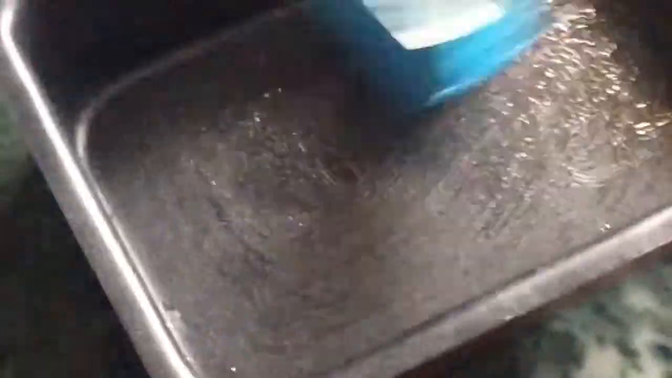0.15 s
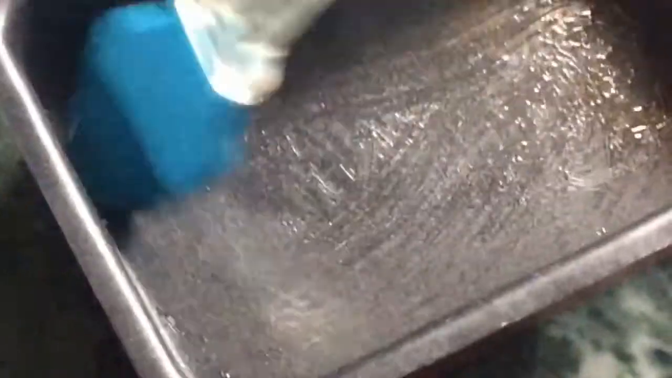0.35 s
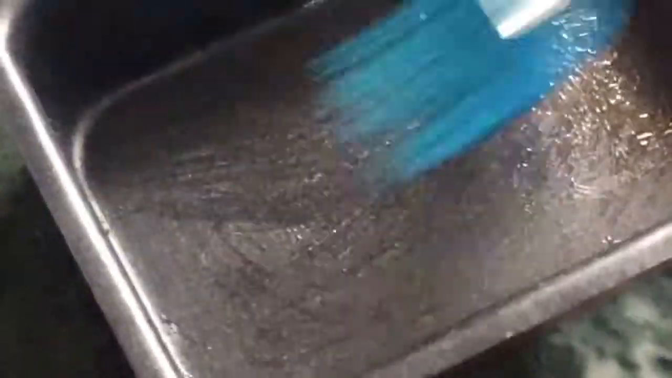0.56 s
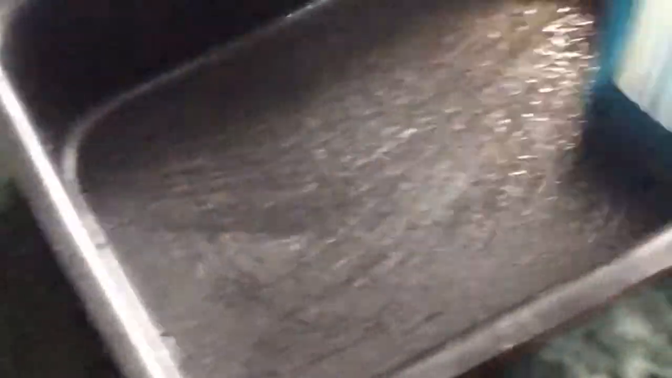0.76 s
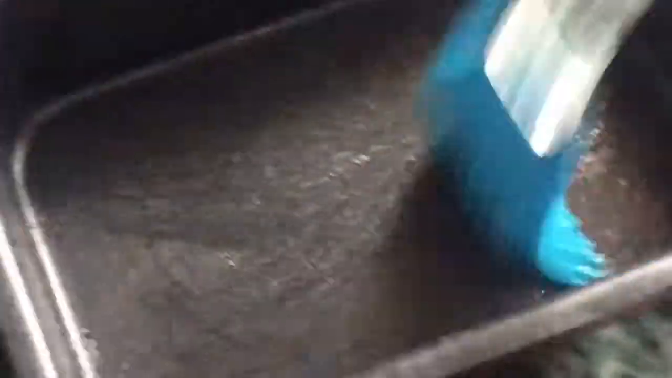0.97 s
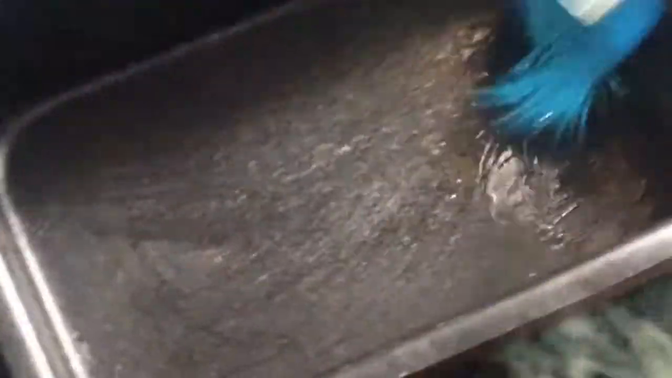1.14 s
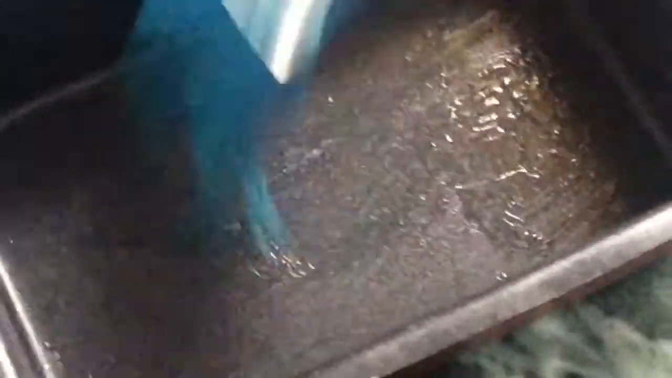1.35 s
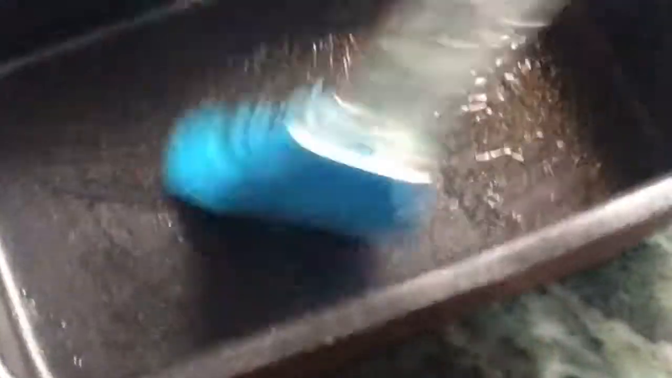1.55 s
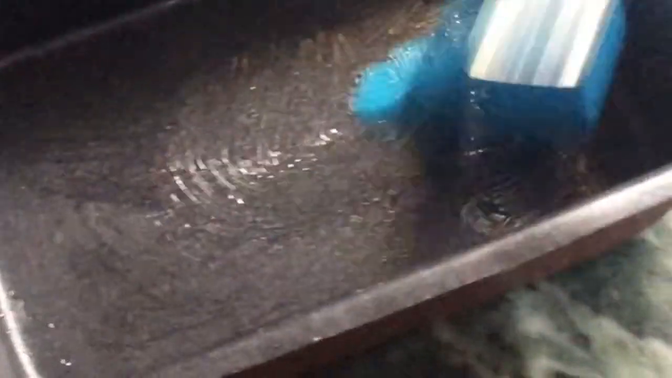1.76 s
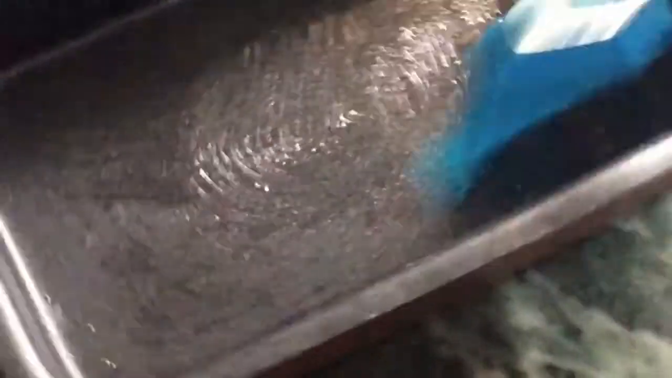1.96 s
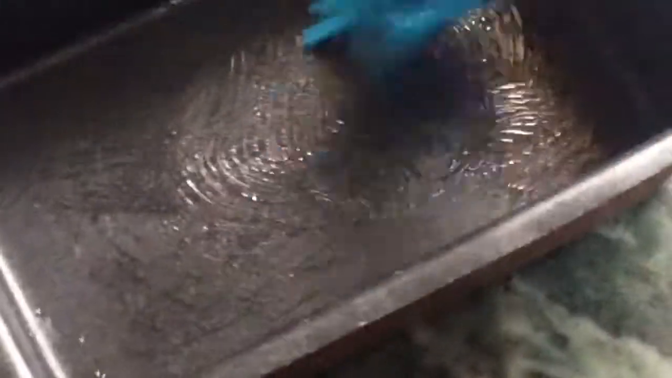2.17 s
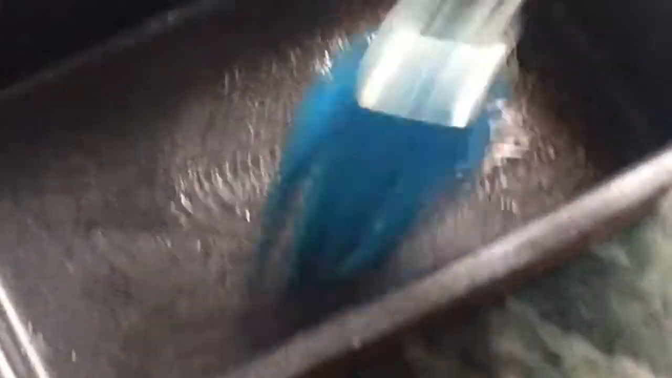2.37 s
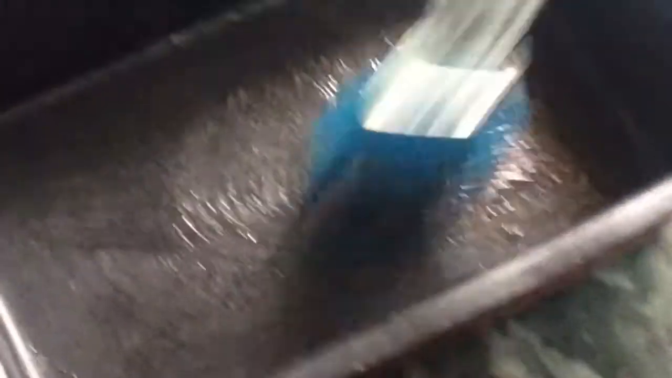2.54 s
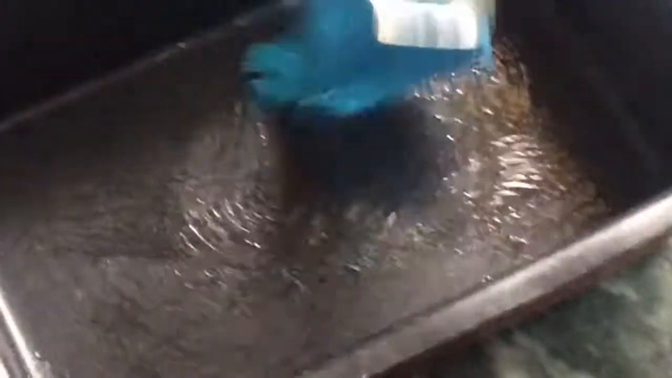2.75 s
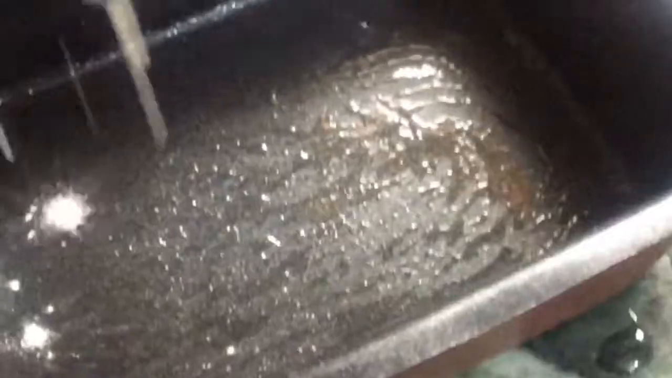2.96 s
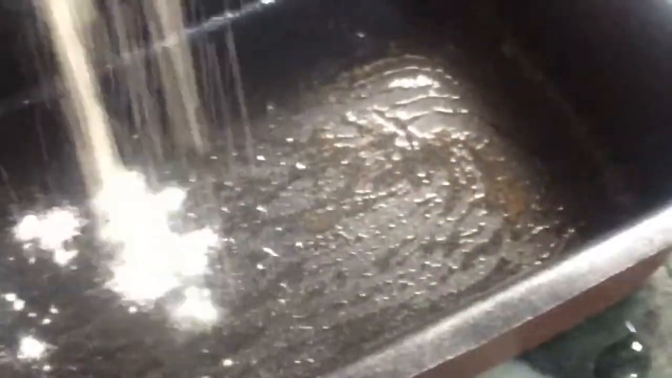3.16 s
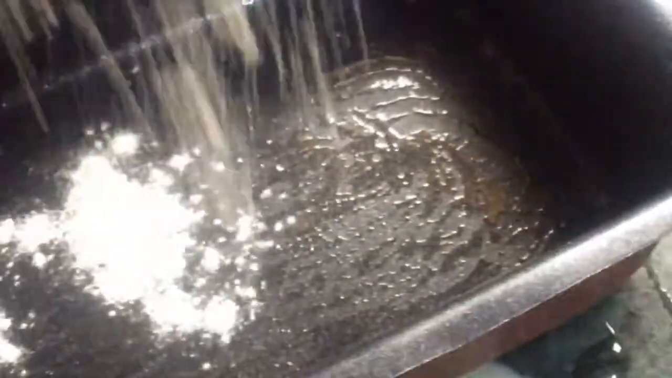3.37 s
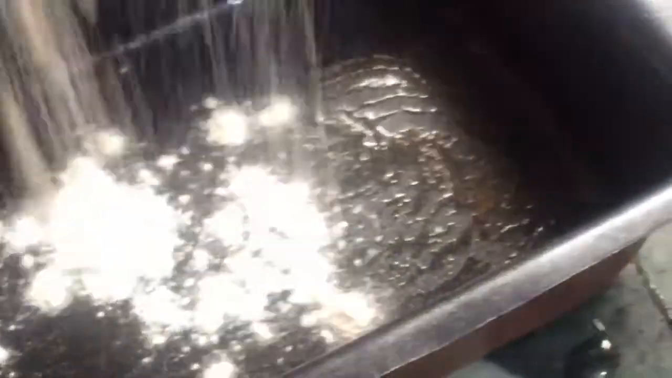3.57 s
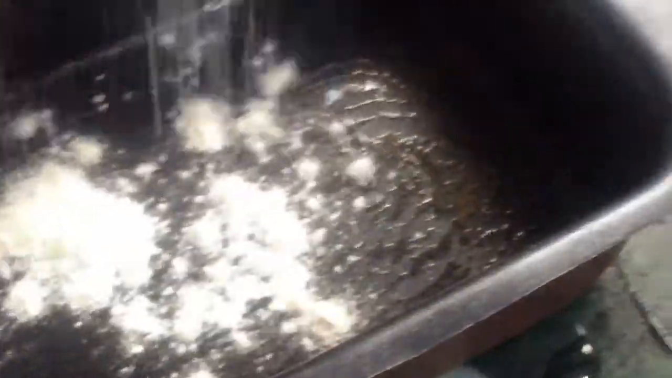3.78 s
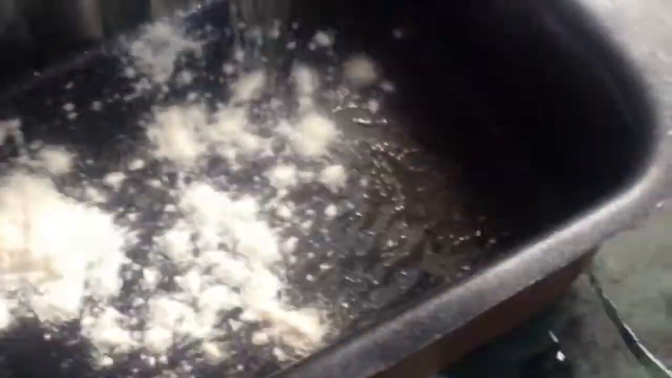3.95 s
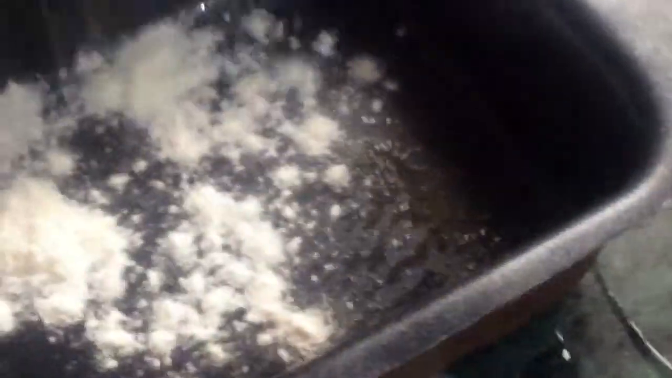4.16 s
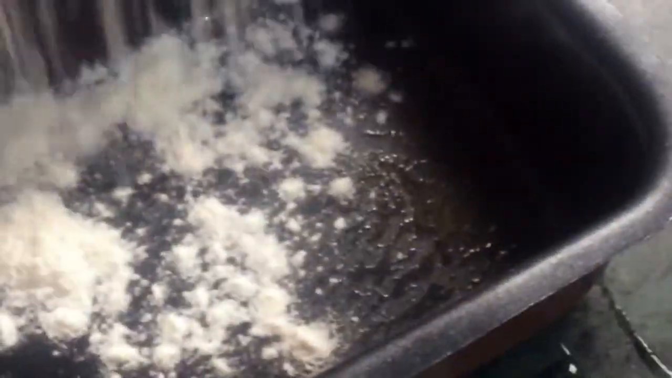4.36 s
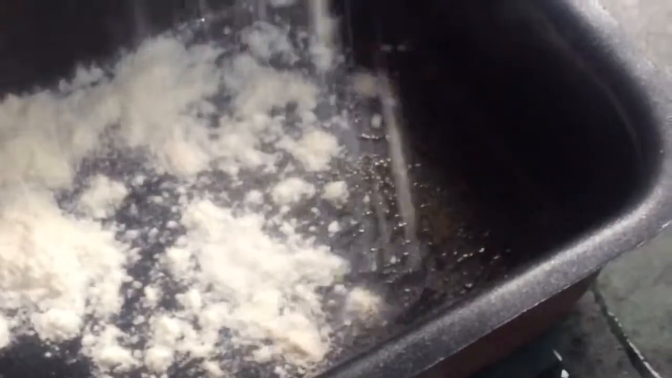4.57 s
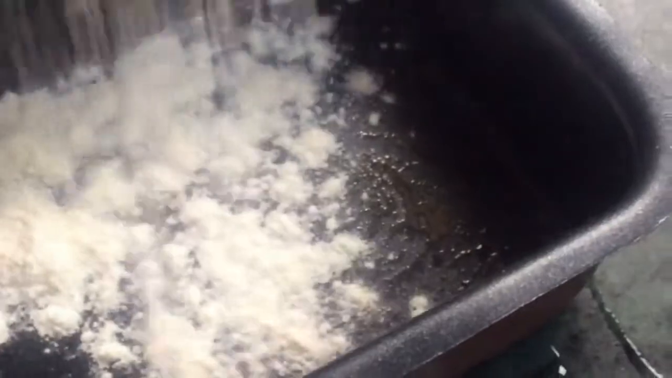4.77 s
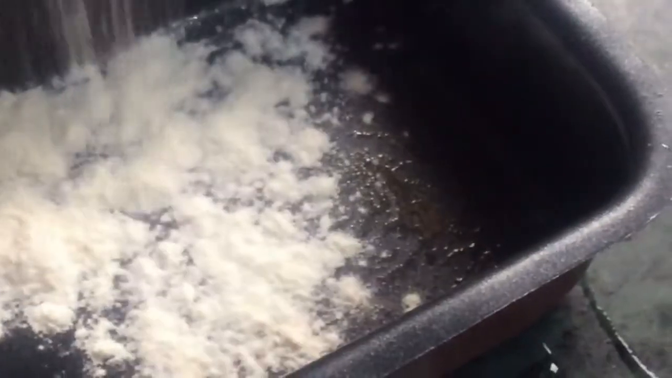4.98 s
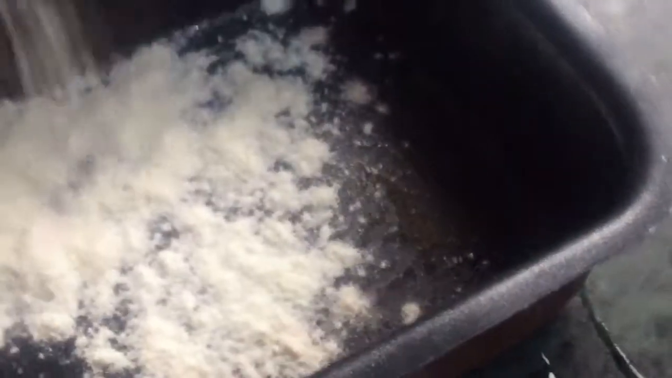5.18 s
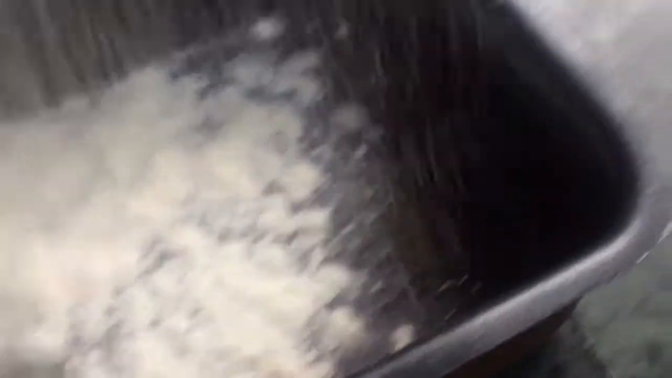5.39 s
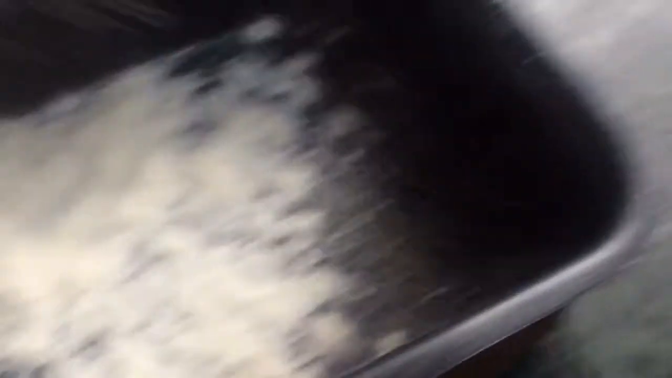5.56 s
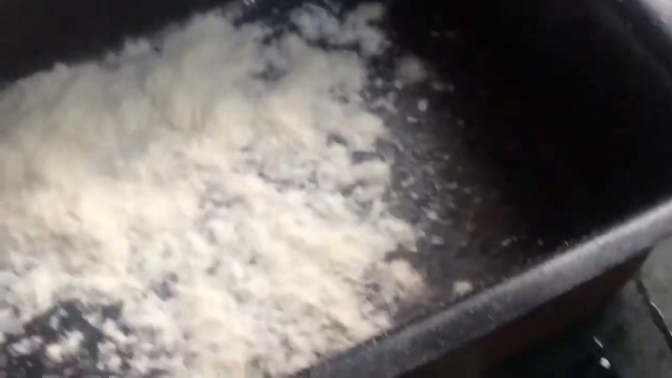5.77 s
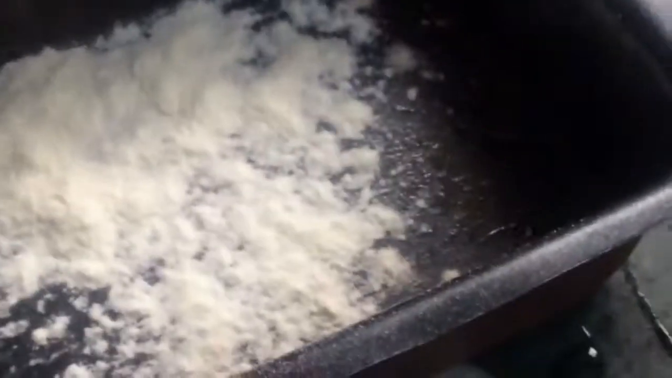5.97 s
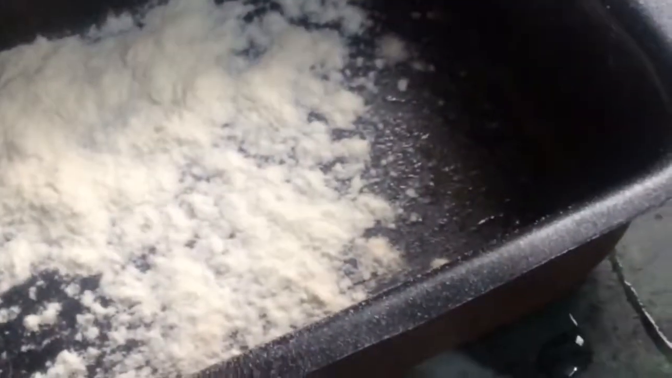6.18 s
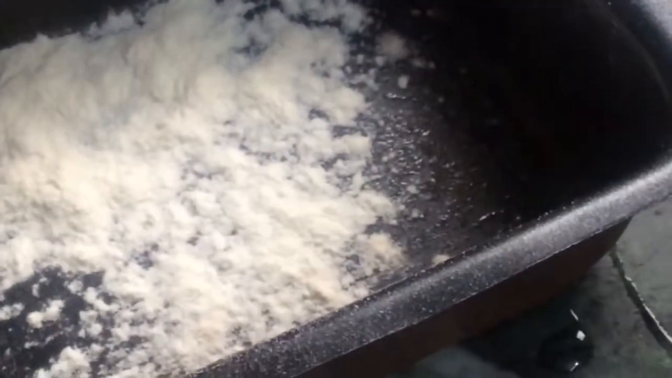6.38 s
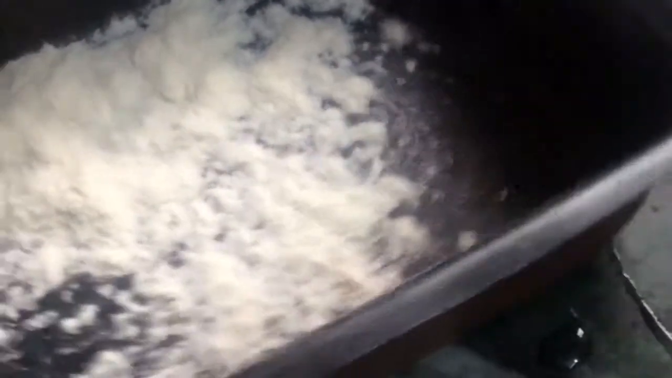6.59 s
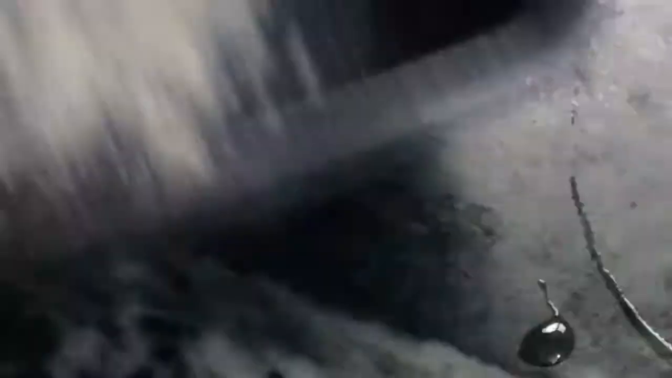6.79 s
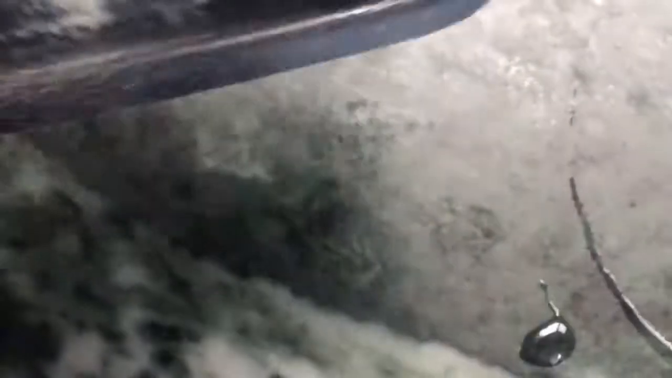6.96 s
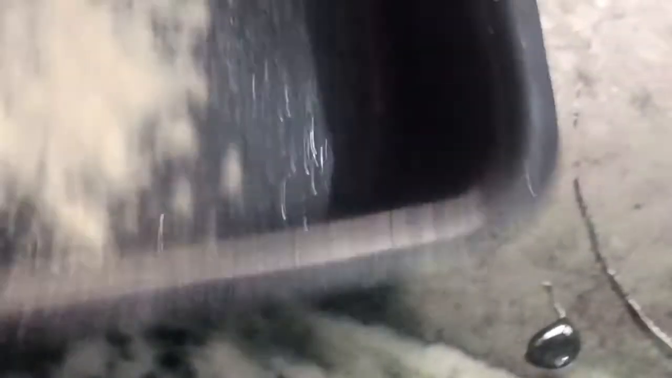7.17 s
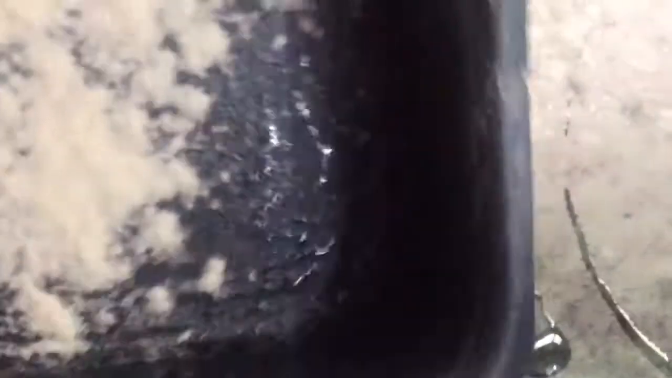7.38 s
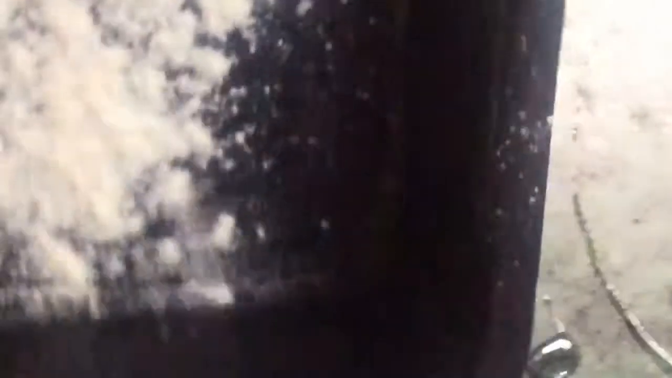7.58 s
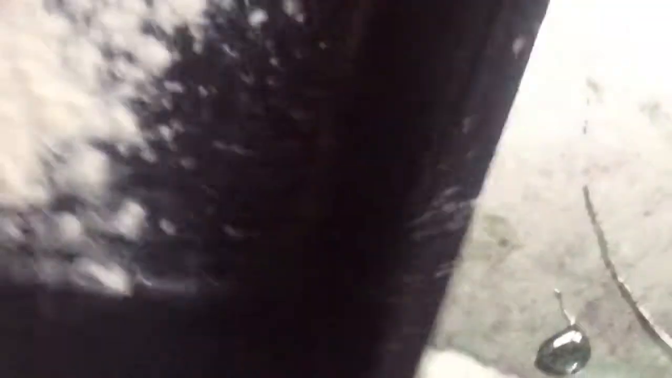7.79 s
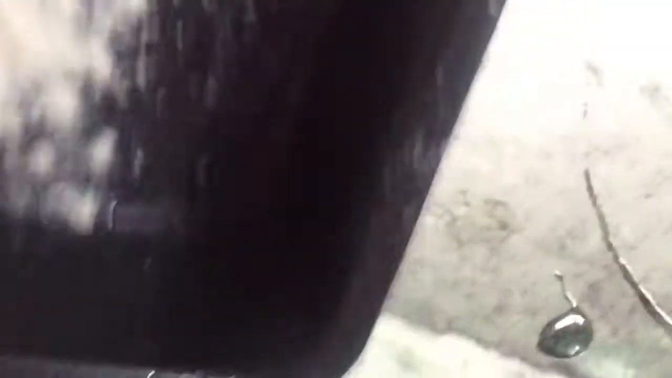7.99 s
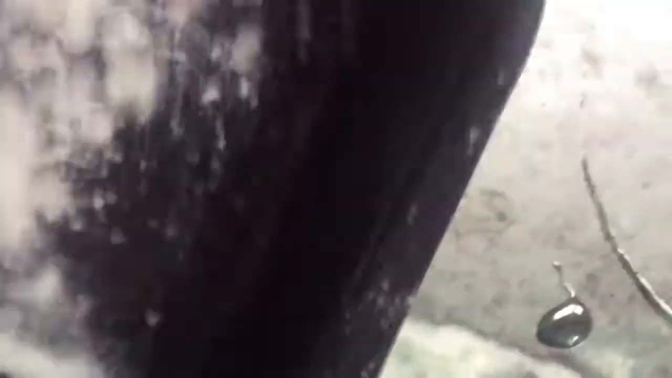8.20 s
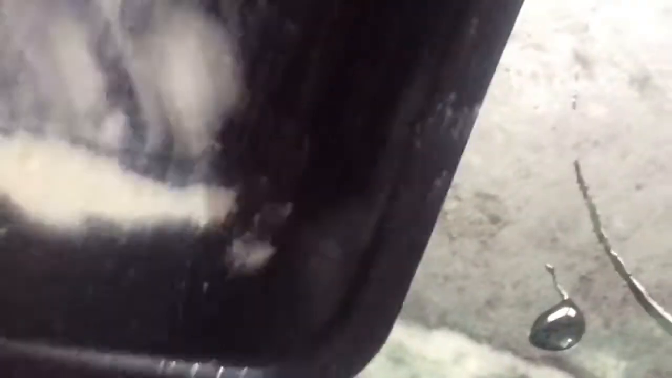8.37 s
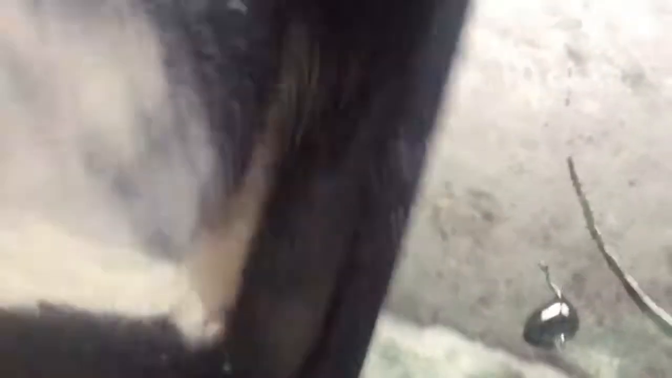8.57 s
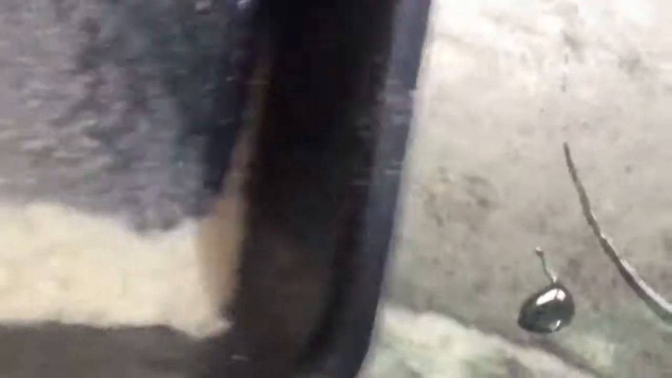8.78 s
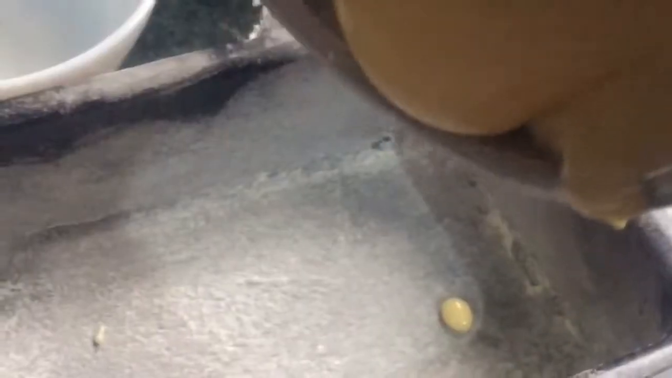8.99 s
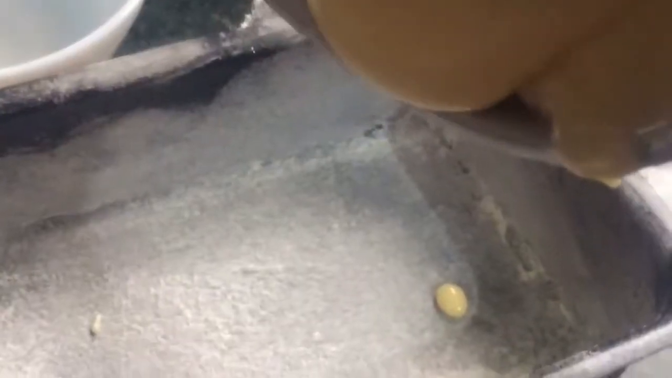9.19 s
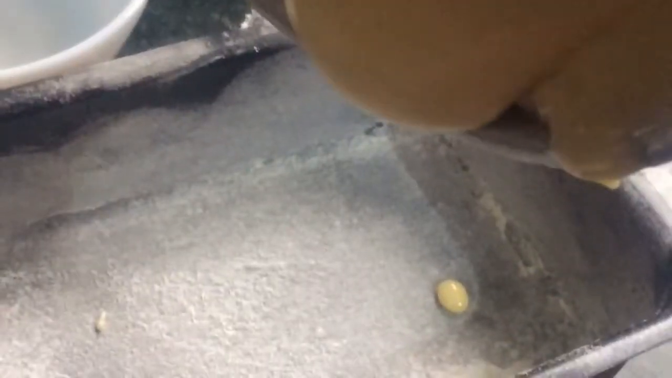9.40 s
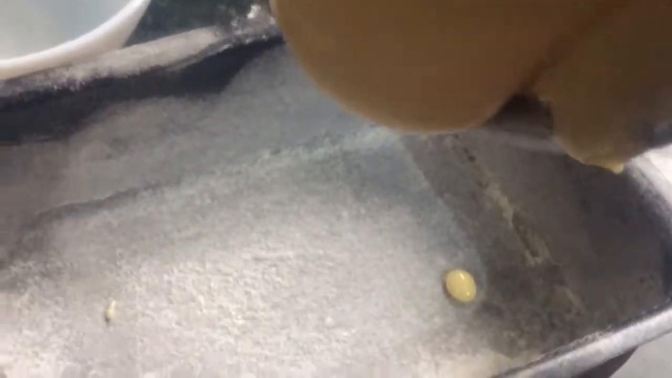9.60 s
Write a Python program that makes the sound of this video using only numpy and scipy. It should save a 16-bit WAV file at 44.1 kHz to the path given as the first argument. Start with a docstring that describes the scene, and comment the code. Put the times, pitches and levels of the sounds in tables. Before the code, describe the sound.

Soft bristle strokes on metal above a steady low hum, a faint distant horn and bird, then three hard, short metallic pan knocks.

```python
"""Bristles brush oil over a pan above an appliance hum; the pan is dusted with flour and knocked on stone.
Three passages, parted by short silences, differ in hum and fan noise; a horn, a bird and faint chirps sound.
Knocks ring decaying modes, rubs and fan are coloured noise, and hum, horn and bird are summed sines.
Gain control ducks the whole sound after loud knocks and recovers slowly."""
import sys
import numpy as np
from scipy import signal
from scipy.io import wavfile
from scipy.ndimage import uniform_filter1d, minimum_filter1d

SR = 44100
rng = np.random.default_rng(int(sys.argv[2]) if len(sys.argv) > 2 else 0)


def digitize_waveform(pressure):
    """Quantize a signal to 16-bit integers and store it at the path in sys.argv[1].

    Rows of a 2-D input are taken as channels; values are limited to [-1, 1].
    """
    field = np.atleast_2d(pressure).T
    bounded = np.clip(field, -1, 1)
    quanta = np.round(bounded * 32767).astype(np.int16)
    wavfile.write(sys.argv[1], SR, quanta)


N = 425124

# extent of each passage, with silence between: (start [s], end [s])
PASSAGES = [(0, 2.8895), (2.904, 8.853), (8.866, 9.7)]
# vibration modes of the pan: (frequency [Hz], relative level [dB], t60 before damping, held to 0.3 at most [s])
PAN_MODES = [(190, -29.5, 0.12), (404, -21, 0.073), (423, -20, 0.19), (711, -16.5, 0.36),
             (797, -22.5, 0.023), (912, -4.5, 0.089), (1074, -8.5, 0.13), (1180, -11, 0.036),
             (1124, -14, 0.21), (1329, -2, 0.13), (1500, -19.5, 0.037), (1634, -4.5, 0.11),
             (1750, -7, 0.16), (1822, -0.5, 0.14), (1863, -21.5, 0.079), (1940, -28.5, 0.075),
             (2310, -27, 0.057), (2570, -28.5, 0.064), (3190, -31.5, 0.21), (3724, -20.5, 0.1),
             (4220, -35.5, 0.17), (5160, -48.5, 0.029), (6070, -40.5, 0.21), (6360, -52.5, 0.059),
             (7550, -40.5, 0.12)]


def gain_of(db):
    """Level definition: 20 dB is a factor of ten in amplitude."""
    return 10 ** (np.asarray(db) / 20)


def evened(x):
    """Normalization to unit root-mean-square amplitude."""
    return x / np.sqrt(np.mean(x ** 2) + 1e-20)


def add(mix, start_s, sound):
    """Superposition: adds a sound to the mix in place, cut at the end of the mix."""
    part = mix[round(start_s * SR):][:len(sound)]
    part += sound[:len(part)]


def smooth_chance(count, size):
    """Low-passed randomness: a curve of rms 1 that changes over about size samples."""
    return evened(signal.oaconvolve(rng.standard_normal(count), np.hanning(size), "same"))


def noise(points, modes=(), patchy_db=0.):
    """Spectral shaping: random short-time spectra of rms 1 with a colour, resonance humps and drifting patches."""
    hz = np.fft.rfftfreq(4096, 1 / SR)
    frames = N // 1024 + 5
    real, imaginary, patches = rng.standard_normal((frames, 2049, 3)).T
    patches = uniform_filter1d(patches, size=40, axis=0)  # broad in frequency
    patches = evened(uniform_filter1d(patches, size=4, axis=1))  # slow in time
    point_hz, point_db = np.transpose(points)
    colour_db = np.interp(np.log(hz + 1), np.log(point_hz + 1), point_db)
    for mode_hz, width_hz, lift_db in modes:
        colour_db = colour_db + lift_db / (1 + (2 * (hz - mode_hz) / width_hz) ** 2)
    spectra = (real + 1j * imaginary) * gain_of(colour_db[:, None] + patchy_db * patches)
    return evened(signal.istft(spectra, nperseg=4096, noverlap=3072)[1][:N])


def tilted(x, tilt_db, hz):
    """Crossover shelving: leans the part above hz up and the part below it down."""
    low = signal.sosfilt(signal.butter(2, hz, fs=SR, output="sos"), x)
    high = signal.sosfilt(signal.butter(2, hz, "high", fs=SR, output="sos"), x)
    # the two filters are in antiphase at the crossover, hence the minus
    return low * gain_of(-tilt_db) - high * gain_of(tilt_db)


def tail(t60, start_s):
    """Reverberation: sparse reflections of random sign die away exponentially."""
    taps = np.zeros(SR // 2)
    slots = np.arange(0, len(taps) - 20, 20)
    places = slots + rng.integers(0, 20, len(slots))
    taps[places] = rng.choice([-1., 1.], len(slots))
    t = np.arange(len(taps)) / SR
    taps *= gain_of(-60 * t / t60) * (t > start_s)
    return taps / np.linalg.norm(taps)


def ring(tilt_db, damping, place):
    """Modal excitation: one blow rings the pan's modes to peak 1; the place struck sets each share."""
    t = np.arange(SR // 4) / SR
    hz, mode_db, t60 = np.transpose(PAN_MODES)[:, :, None]
    share = .7 + .6 * np.cos(np.pi * place * np.arange(len(PAN_MODES)))[:, None]
    damped_t60 = np.clip(t60, .01, .3) * np.clip(damping, .05, 2)
    level_db = mode_db + tilt_db * np.log2(hz / 1500) - 60 * t / damped_t60
    sound = -(share * gain_of(level_db) * np.sin(2 * np.pi * hz * t)).sum(axis=0)
    sound = sound * (1 - np.exp(-t / .0006))
    sound = np.convolve(sound, np.hanning(7))  # the contact lasts a fraction of a millisecond
    return sound / abs(sound).max()


def strike_pan(crack):
    """Impact: each blow or rebound rings the modes and adds a short burst of cracking noise."""
    # blows and rebounds: (time [s], peak of the ring [dB], tilt [dB per octave in the ring, dB in the crack],
    # damping [factor on t60], place struck [0-1])
    blows = [(1.144, -43, -2, 0.2, .19), (1.445, -49, 11, .2, .3), (1.992, -52, -1, 0.34, .3),
             (3.548, -43, 6, 0.41, .05), (6.634, -38.5, 4, 0.68, .3), (6.656, -32.5, 3, 0.41, .3),
             (6.716, -38, 2, .3, .3), (7.4743, 1.5, .1, 0.22, .19), (7.4831, -6, -2, 0.088, .3),
             (7.493, -18, 4, 0.41, 0.12), (7.529, -29, 0, 0.5, 0.1), (7.815, -25, -7, 0.33, .08),
             (7.821, -32, 2, 0.82, 0.37), (8.176, -3, -2, .55, .15), (8.1842, -8, 3.5, .3, .155),
             (8.241, -22.5, 0, .6, .31), (8.5275, 0, -2, 0.3, .43), (8.532, -3.5, 3.5, 0.23, 0.42),
             (8.543, -5.5, -1.5, 0.5, .155)]
    out = np.zeros(N)
    t = np.arange(SR // 20) / SR
    for start_s, peak_db, tilt_db, damping, place in blows:
        add(out, start_s, gain_of(peak_db) * ring(tilt_db, damping, place))
        burst = tilted(crack[round(start_s * SR):][:len(t)], tilt_db, 1700)
        crack_db = peak_db - 8.5 - 60 * t / 0.021
        add(out, start_s, gain_of(crack_db) * (1 - np.exp(-t / 0.00073)) * burst)
    return out


def chatter_pan(crack):
    """Repeated contact: a random shower of tiny impulses excites the pan as it chatters and slides on stone."""
    # spells: (start [s], swell time [s], level at full swell before the lean [dB], t60 [s],
    # treble lean [dB], place touched [0-1])
    spells = [(7.491, 0.0054, -29, 0.11, 1, .18), (7.529, .02, -46.5, 0.41, 2.5, .17),
              (7.7, 0.047, -50, 0.14, -10.5, 0.42), (7.821, 0.0065, -45, 0.73, -4, .3),
              (8.19, .066, -26, .05, -3, .31), (8.275, 0.025, -41, 0.13, 0, .05),
              (8.554, 0.0089, -23.5, .1, -6.5, 0.47), (8.6, 0.038, -45.5, 0.28, 2, .42)]
    swell_db = -8  # level at the start of a spell, against its full level
    lead = SR // 10  # contacts before the spell, so that it opens already ringing
    out = np.zeros(N)
    contacts = rng.standard_normal(N) * (rng.random(N) < 1200 / SR)  # about 1200 a second
    t = np.arange(SR // 2) / SR
    for start_s, swell_s, peak_db, t60, lean_db, place in spells:
        spell = slice(round(start_s * SR) - lead, round(start_s * SR) + len(t))
        response = signal.oaconvolve(contacts[spell], ring(-1.5, 0.57, place))
        rattle = evened(response[:len(t) + lead]) + 0.69 * crack[spell]
        rise_db = swell_db * (1 - t / swell_s)
        decay_db = -60 * (t - swell_s) / max(t60, .01)
        level_db = peak_db + np.where(t < swell_s, rise_db, decay_db)
        part = tilted(rattle[lead:], lean_db, 1000)
        add(out, start_s, gain_of(level_db) * np.minimum(t / .003, 1) * part)
    return out


def pan():
    """Forced and free vibration: blows and chatter share one noise, coloured by the pan's modes."""
    # colour of the crack: (frequency [Hz], relative density [dB per Hz])
    crack_colour = [(100, -24), (450, -10.5), (1200, 5), (2100, -9), (2750, -31.5), (3900, -24.5),
                    (7000, -35.5), (9000, -39), (11000, -62.5), (15000, -81.5)]
    crack = noise(crack_colour, [(hz, 0.0081 * hz, 11) for hz, db, t60 in PAN_MODES])
    return strike_pan(crack) + chatter_pan(crack)


def rubs():
    """Friction: bristles, flour and fingers scratch the metal as noise in clumps of a few milliseconds."""
    # strokes: (start [s], length [s], body level [dB], treble level [dB])
    strokes = [(0, 0.045, -48.5, -61), (0.058, 0.078, -51, -67.5), (0.723, 0.053, -56.5, -77),
               (0.81, 0.021, -66, -68.5), (0.896, 0.11, -50.5, -69.5), (0.988, .07, -55, -76),
               (1.147, 0.045, -52, -70), (1.434, 0.11, -53, -69), (1.804, 0.027, -63, -74),
               (1.885, 0.035, -54.5, -74), (1.989, 0.039, -50, -69), (2.024, 0.065, -46, -64.5),
               (2.809, 0.027, -74, -74), (3.542, 0.024, -70, -65), (4.532, 0.053, -68, -71),
               (4.919, .04, -65, -70), (5.339, 0.034, -72, -65), (5.545, .03, -51, -67),
               (5.608, 0.024, -55, -66.5), (5.863, 0.026, -75, -73), (6.54, 0.058, -65, -68.5),
               (6.585, 0.18, -49, -65), (6.765, 0.062, -53, -65.5), (6.943, 0.08, -58, -75),
               (9.302, 0.022, -58, -71)]
    # low answer of the pan floor: (frequency [Hz], relative density [dB per Hz])
    body_colour = [(200, -16), (600, 0), (1100, -9.5), (1550, 1), (1900, -9), (2450, -9.5), (2900, -27),
                   (4000, -60)]
    # high hiss of the bristles: (frequency [Hz], relative density [dB per Hz])
    treble_colour = [(2500, -31), (3400, -2.5), (4100, 1), (5200, -3), (6300, -7.5), (7000, -13.5),
                     (8000, -5.5), (9500, -20), (11000, -17), (14000, -44)]
    clumps = evened(gain_of(2.8 * smooth_chance(N, size=200)))
    body = noise(body_colour, [(hz, 0.036 * hz, 5) for hz, db, t60 in PAN_MODES]) * clumps
    treble = noise(treble_colour, [(hz, 0.019 * hz, 7) for hz, db, t60 in PAN_MODES]) * clumps
    out = np.zeros(N)
    for start_s, length_s, body_db, treble_db in strokes:
        u = np.arange(0, 1, 1 / (SR * max(length_s, .005)))
        stroke = slice(round(start_s * SR), round(start_s * SR) + len(u))
        shape = np.minimum(u / 0.17, 1) * np.sqrt(1 - u ** 2)  # quick start, rounded end
        grain = gain_of(body_db) * body[stroke] + gain_of(treble_db) * treble[stroke]
        add(out, start_s, shape * grain)
    return out


def bumps():
    """Damped oscillation: a dull bump through the counter is a soft-starting, dying tone with a puff of noise."""
    # bumps: (time [s], level before onset and decay [dB], pitch [Hz])
    thuds = [(1.999, -36, 277), (3.55, -36, 284), (3.58, -35.5, 203), (3.629, -42, 151), (3.73, -40.5, 136),
             (7.475, -30, 190), (7.84, -32.5, 353), (7.865, -33, 414), (7.906, -36, 423),
             (8.528, -27.5, 401), (8.719, -40, 454), (8.881, -48, 125)]
    t60 = 0.16  # s
    out = np.zeros(N)
    t = np.arange(SR // 4) / SR
    dull = signal.butter(4, [90, 900], "band", fs=SR, output="sos")
    puffs = signal.sosfilt(dull, rng.standard_normal((len(thuds), len(t))))
    for (start_s, level_db, hz), puff in zip(thuds, puffs):
        shape = gain_of(level_db - 60 * t / t60) * (1 - np.exp(-t / 0.0058))
        add(out, start_s, shape * (np.sin(2 * np.pi * hz * t) + 0.57 * evened(puff)))
    return out


def horn():
    """Harmonic series: toots of a buzzing horn swell until let go, blurred by echoes from the street."""
    # toots: (start [s], length [s], level at full swell before the harmonic levels [dB])
    toots = [(2.058, 0.038, -62.5), (2.116, 0.13, -57), (2.372, 0.117, -53)]
    # audible harmonics: (harmonic number, relative level [dB])
    harmonics = [(7, -6.5), (8, 1), (9, -15), (10, -27)]
    pitch_hz, swell_db = 410, -13
    echo_db, echo_t60 = -11, 1  # dB, s
    push, out = np.zeros(N), np.zeros(N)
    for start_s, length_s, peak_db in toots:
        u = np.arange(0, 1, 1 / (SR * length_s))
        add(push, start_s, gain_of(peak_db + swell_db * (1 - u)) * signal.windows.tukey(len(u), .3))
    turns = np.cumsum(pitch_hz * (1 + .003 * smooth_chance(N, size=700))) / SR
    for number, tone_db in harmonics:
        flutter_db = 3 * smooth_chance(N, size=1000)  # each harmonic swells with its own mix of echoes
        level = np.sqrt(2) * push * gain_of(tone_db + flutter_db)
        out += level * np.sin(2 * np.pi * number * turns)
    return out + gain_of(echo_db) * signal.fftconvolve(out, tail(t60=echo_t60, start_s=.02))[:N]


def bird():
    """Frequency modulation: whistles glide up and then hold, blurred by echoes from the street."""
    # whistles: (start [s], length [s], level before the fade [dB])
    calls = [(3.994, 0.13, -48), (4.49, 0.12, -48), (4.65, 0.12, -54)]
    low_hz, high_hz, rise_s, fade_db = 1183, 1285, 0.072, -10
    out = np.zeros(N)
    for start_s, length_s, level_db in calls:
        t = np.arange(0, length_s, 1 / SR)
        glide = np.sin(np.pi / 2 * np.minimum(t / rise_s, 1)) ** 2
        hz = low_hz + (high_hz - low_hz) * glide
        level = gain_of(level_db + fade_db * (t / length_s) ** 2) * signal.windows.tukey(len(t), .2)
        add(out, start_s, level * np.sin(2 * np.pi * np.cumsum(hz) / SR))
    return out + gain_of(-1.5) * signal.fftconvolve(out, tail(t60=1.7, start_s=.02))[:N]


def fuzzy_chirps():
    """Quadrature modulation: narrow noise on a carrier that slides up a little and fades."""
    # faint high chirps: (start [s], level before onset and decay [dB])
    chirps = [(4.09, -80), (5.25, -82), (5.8, -84), (5.96, -74), (6.36, -73), (6.93, -76), (7.13, -75),
              (7.3, -75.5), (7.738, -77), (7.9, -74.5)]
    start_hz, rise_hz, lowpass_hz = 4100, 148, 60
    rise_s, t60 = 0.13, .9  # time constant of the slide, decay time
    out = np.zeros(N)
    t = np.arange(SR // 2) / SR
    turns = np.cumsum(start_hz + rise_hz * (1 - np.exp(-t / rise_s))) / SR
    lowpass = signal.butter(2, lowpass_hz, fs=SR, output="sos")
    fuzz = signal.sosfilt(lowpass, rng.standard_normal((len(chirps), 2, len(t))))
    for (start_s, level_db), (a, b) in zip(chirps, fuzz):
        narrow = evened(a * np.cos(2 * np.pi * turns) + b * np.sin(2 * np.pi * turns))
        add(out, start_s, gain_of(level_db - 60 * t / t60) * np.minimum(t / 0.016, 1) * narrow)
    return out


def appliance():
    """Magnetostriction and resonance: wavering hum at twice the mains rate, motor tones, fan noise in a cabinet."""
    # levels in each passage: (hum [dB], fan noise [dB])
    levels = [(-46.5, -48), (-47, -47), (-42.5, -48.5)]
    # colour of fan and room noise, one list a passage: (frequency [Hz], relative density [dB per Hz])
    air_colours = [
        [(20, -88), (60, -82.5), (95, -73.5), (165, -81), (320, -83.5), (700, -86), (1000, -90), (2500, -99.5),
         (2750, -108), (3600, -114), (7000, -120), (9400, -119), (10200, -124), (14000, -134), (15200, -150)],
        [(20, -85.5), (70, -85.5), (100, -70.5), (170, -80), (320, -83), (700, -83.5), (1000, -87.5),
         (2100, -88.5), (2400, -104), (4400, -109), (6800, -121), (9400, -119), (10200, -123), (14000, -134),
         (15200, -150)],
        [(20, -87), (70, -85), (100, -83.5), (170, -78), (320, -82.5), (700, -84.5), (1000, -90.5), (2100, -97),
         (2700, -106), (4000, -115), (7000, -121), (9400, -118), (10200, -123), (14000, -134), (15200, -150)],
    ]
    # cabinet and room resonances that the fan noise fills: (frequency [Hz], width [Hz], lift [dB])
    cabinet = [(49.7, 15, 10.5), (127.5, 35.7, 8), (269, 8.6, 7.5), (361.2, 32.8, 13), (396, 54, 8),
               (465, 30, 4.5), (609.6, 24, 8.5), (695, 53, 5.5), (720, 33, -0.5), (1250, 130, 3.5),
               (1863, 100, 5), (2054, 24, 7), (3020, 67, 3.5)]
    # tones beside the hum, the first beating with it: (frequency [Hz], mean level [dB])
    motor = [(90.2, -60.5), (201.5, -64.5), (9001, -92.5)]
    hum_hz = 99.95
    t = np.arange(N) / SR
    tones, out = np.zeros(N), np.zeros(N)
    for hz, tone_db in motor:
        level = gain_of(tone_db + 0.83 * smooth_chance(N, size=9000))
        tones += level * np.sqrt(2) * np.sin(2 * np.pi * hz * t)
    waver = smooth_chance(N, size=12000)
    for (start_s, end_s), (hum_db, air_db), colour in zip(PASSAGES, levels, air_colours):
        phase = rng.random()  # in turns
        hum = np.sqrt(2) * gain_of(hum_db + 0.32 * waver) * np.sin(2 * np.pi * (hum_hz * t + phase))
        air = gain_of(air_db) * noise(colour, cabinet, patchy_db=1.84)
        out += ((t >= start_s) & (t < end_s)) * (hum + tones + air)
    return out


def scene():
    """Superposition: near sounds with their room reverberation, then the background sources."""
    near = pan() + rubs() + bumps()
    room = gain_of(-12) * signal.fftconvolve(near, tail(t60=0.24, start_s=0.0028))[:N]
    background = horn() + bird() + fuzzy_chirps() + appliance()
    return (near + room + background)[None]


def record(dry):
    """Dynamic compression: bass roll-off, slow ducking, silences, a peak limiter and a band limit."""
    t = np.arange(N) / SR
    dry = signal.sosfilt(signal.butter(2, 38, "high", fs=SR, output="sos"), dry)
    power_db = 10 * np.log10(abs(uniform_filter1d(dry[0] ** 2, size=400)) + 1e-12)
    wet = dry * 0
    for start_s, end_s in PASSAGES:
        inside = (t >= start_s) & (t < end_s)
        fall_db = 4.7 * t[inside]  # the held level falls 4.7 dB a second
        held_db = np.maximum.accumulate(power_db[inside] + fall_db) - fall_db
        over_db = np.maximum(held_db + 13.5, 0)  # threshold at -13.5 dB
        cut_db = signal.lfilter([.002], [1, .002 - 1], .45 * over_db)  # takes hold in about 10 ms
        fade = np.clip((t[inside] - start_s) / 0.00067, 0, 1)
        wet[:, inside] = dry[:, inside] * fade / gain_of(cut_db)
    headroom = minimum_filter1d(np.minimum(.98 / (abs(wet) + 1e-9), 1), size=121)
    wet = wet * uniform_filter1d(uniform_filter1d(headroom, size=61), size=61)
    band_limit = signal.firwin(255, 15200, window=("kaiser", 9), fs=SR)  # low-pass edge in Hz
    return signal.oaconvolve(wet, band_limit[None], "same")


dry = scene()
out = record(dry)
digitize_waveform(out)
```